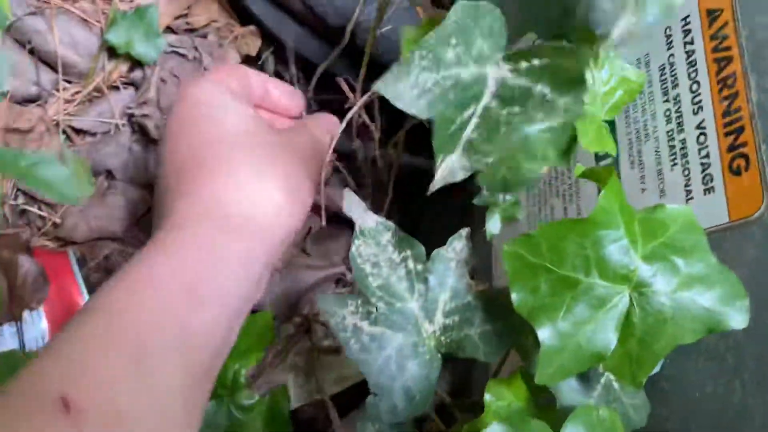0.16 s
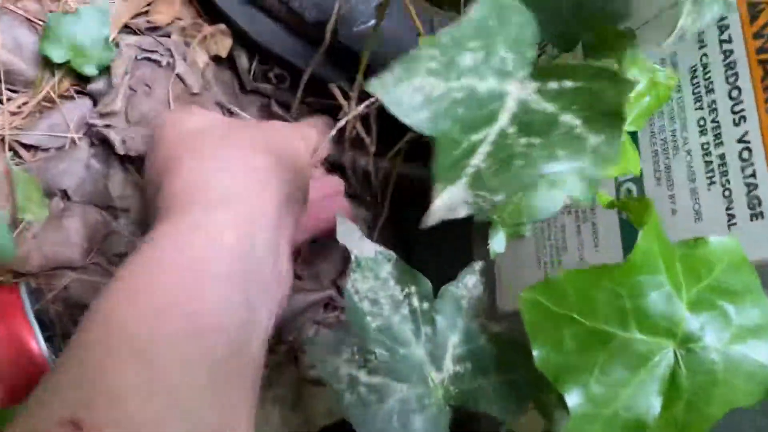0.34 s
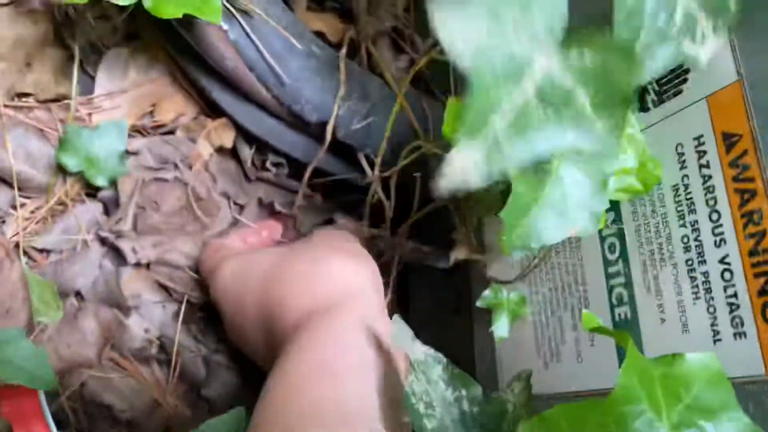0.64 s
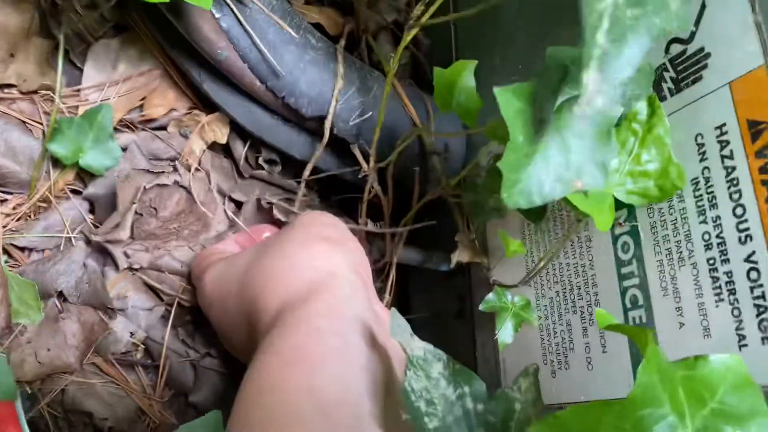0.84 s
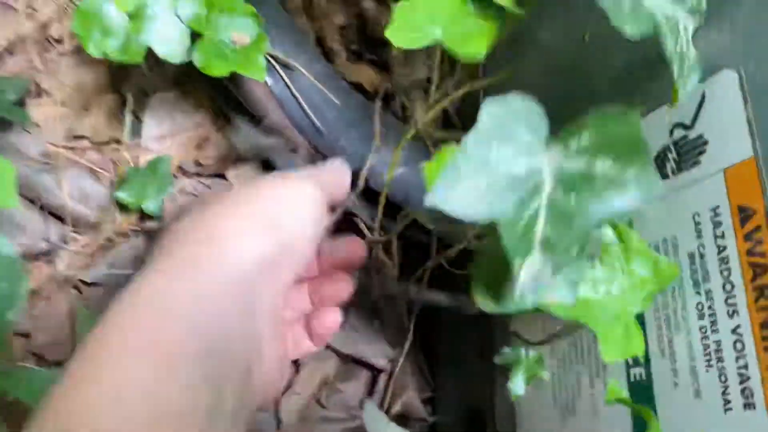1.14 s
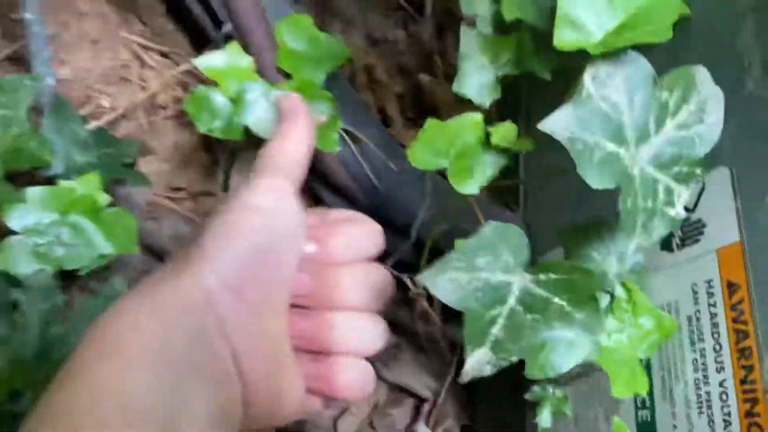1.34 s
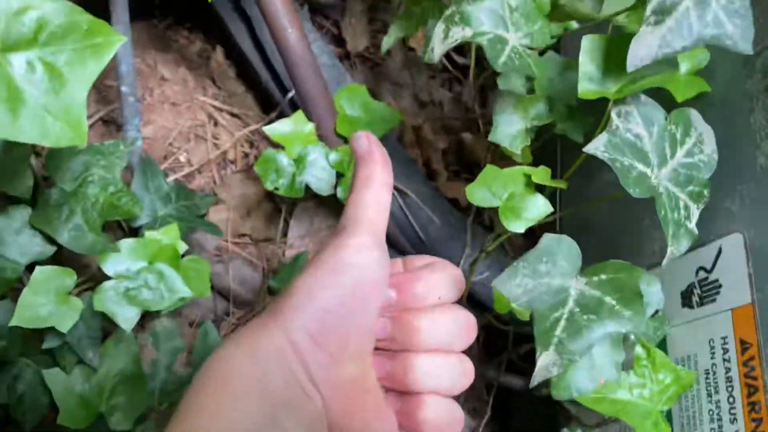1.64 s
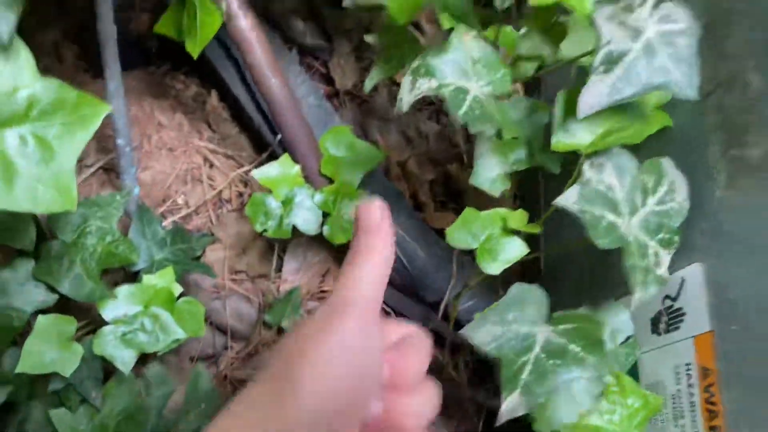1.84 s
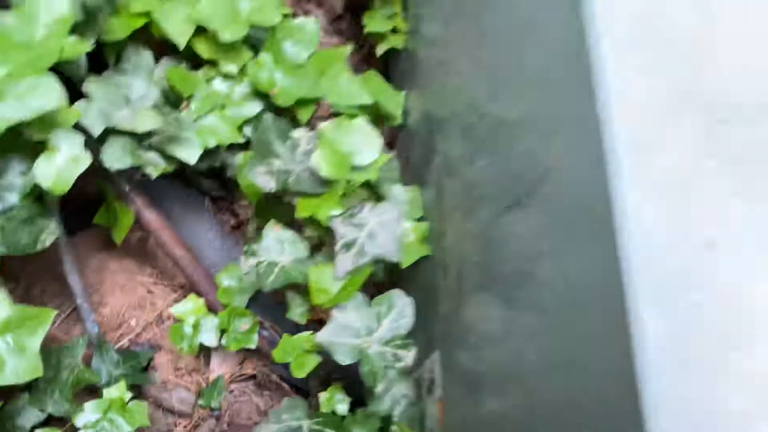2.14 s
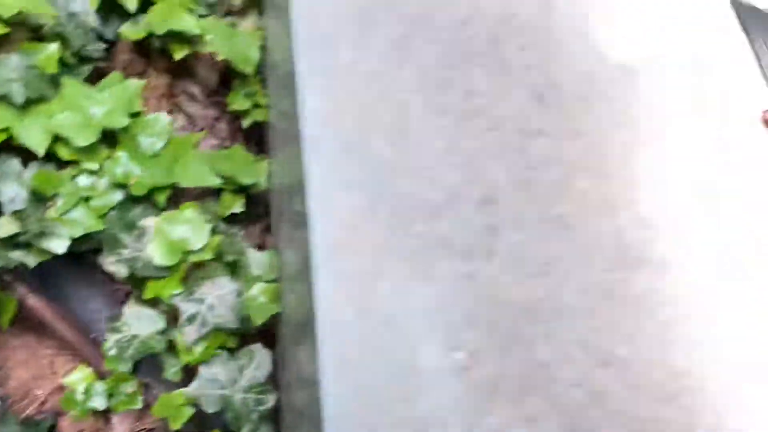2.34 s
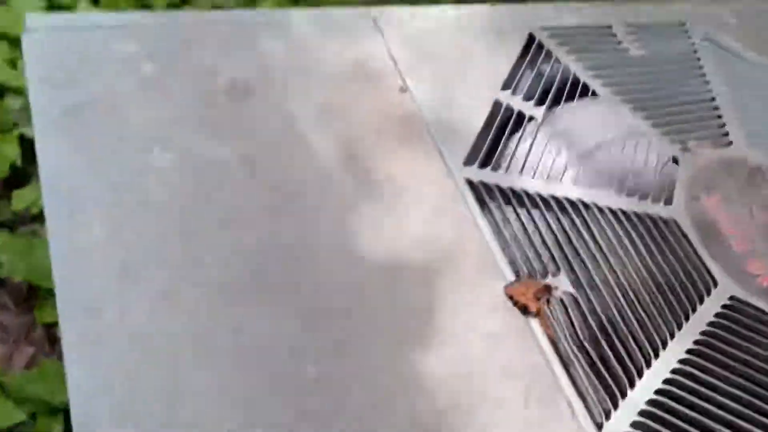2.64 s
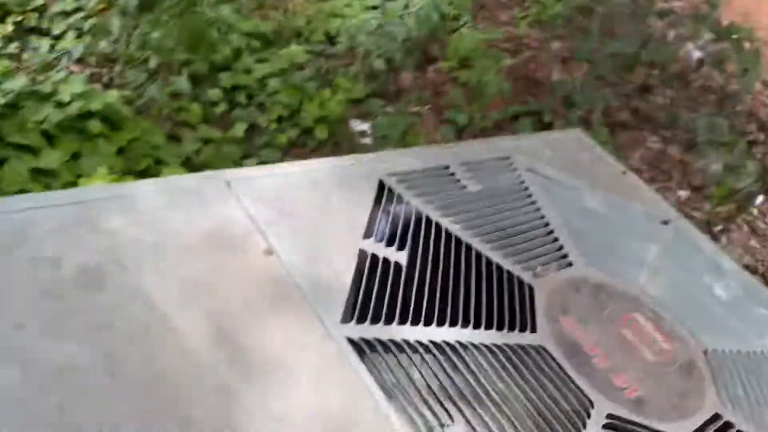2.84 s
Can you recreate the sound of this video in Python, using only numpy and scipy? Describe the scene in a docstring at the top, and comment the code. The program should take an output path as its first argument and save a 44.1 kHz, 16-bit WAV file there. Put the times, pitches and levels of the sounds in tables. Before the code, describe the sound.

An outdoor air conditioner hums low and steadily, its fan air fluttering slightly, for three seconds. Close to the microphone, dry leaves crinkle and twigs snap from 0 to about 1.2 seconds, busiest early on. Mostly machine drone follows until a loud, tearing crack at 2.2 seconds momentarily ducks everything. The air then grows brighter and rushing above the grille, with a short knock near 2.9 seconds.

```python
"""An outdoor air conditioner runs: wavering sine multiples for compressor, mains hum and two-bladed fan,
and coloured noise, chopped at blade rate, for its air. The microphones rise over the top grille into brighter outflow.
A stem cracks close by (tearing bursts of grainy noise with a pitched body) and ducks the recorder's limiter.
Snaps and hollow knocks (dying pitched bursts) sound as a hand pulls at vines and dry leaves (clumps of grains)."""
import sys
import numpy as np
from scipy import signal
from scipy.fft import rfft, irfft
from scipy.io import wavfile
from scipy.ndimage import uniform_filter1d, minimum_filter1d

SR = 44100
rng = np.random.default_rng(int(sys.argv[2]) if len(sys.argv) > 2 else 0)


def digitize_waveform(pressure):
    """Quantize a signal to 16-bit integers and store it at the path in sys.argv[1].

    Rows of a 2-D input are taken as channels; values are limited to [-1, 1].
    """
    field = np.atleast_2d(pressure).T
    bounded = np.clip(field, -1, 1)
    quanta = np.round(bounded * 32767).astype(np.int16)
    wavfile.write(sys.argv[1], SR, quanta)


N = 132300

# Partials of each machine: (multiple, level [dB rms], left minus right [dB])
COMPRESSOR_PARTIALS = [(1, -22, -2.5), (4, -33, 6.5)]
MAINS_PARTIALS = [(1, -31.5, 0.32), (2, -36, 0.75), (3, -44, 1)]
BLADE_PARTIALS = [(1, -39.5, 0), (2, -27.5, 1), (3, -35.5, 0.54), (4, -36.5, 0.27), (6, -38.5, 0.2)]
# Hum swell as the microphones move: (time [s], compressor [dB], mains hum [dB], blades [dB])
HUM_SWELL = [(0, -0.5, 2.5, 3.6), (.4, -3.3, -2, -0.3), (.8, -1.5, 2.5, 1.3), (1.2, -2.3, -1.7, 0.1),
             (1.6, -1.2, 2.1, 2.5), (2.0, 1.5, 1.1, -0.5), (2.4, -2, 0.7, 1.5), (2.7, 2, 3, 3.2),
             (3, -6.5, -19, -1.5)]
# Air levels: (time [s], near the ground [dB], beside the cabinet [dB], above the grille [dB], grille hiss [dB])
AIR_LEVELS = [(0, -23, -40, -37, -59), (.5, -24, -36, -37.5, -63), (.95, -23, -33.5, -37, -69),
              (1.3, -29.5, -25.5, -35, -66), (1.7, -40.5, -25, -37.5, -55), (1.9, -36, -24, -36.5, -48.5),
              (2.08, -41, -23.5, -31, -44), (2.2, -45, -17, -30.5, -42), (2.45, -27, -32.5, -21.5, -43),
              (2.65, -30.5, -32, -21, -40), (2.8, -43, -30, -20.5, -41), (2.92, -38, -38, -21, -41),
              (3, -20, -55, -24, -36)]
# Outflow roar through the slats: (time [s], level [dB])
ROAR_LEVELS = [(0, -75), (2.2, -60), (2.4, -49), (2.6, -43), (2.8, -41), (3, -36)]
# Relative spectra of the air, in the same order, roar last: (frequency [Hz], level [dB])
GROUND_AIR_COLOUR = [(20, -33), (45, -4.5), (100, 0), (125, 0), (150, -11), (185, -8.5), (240, -23.5),
                     (280, -25), (390, -10.5), (480, -15.5), (800, -21.5), (1000, -30.5), (1200, -27.5),
                     (2000, -33.5), (4000, -44), (7000, -42.5), (9000, -53), (12000, -60), (16000, -72)]
SIDE_AIR_COLOUR = [(20, -38), (45, -4.5), (90, -6), (120, -7.5), (170, -9.5), (240, -7.5), (300, -12),
                   (400, -13.5), (460, -26.5), (600, -15), (700, -24.5), (820, -29.5), (1030, -23),
                   (1400, -33), (2000, -36.5), (3000, -39), (7000, -46.5), (9000, -60.5), (12000, -56),
                   (16000, -76)]
TOP_AIR_COLOUR = [(50, -15), (100, -28), (155, 5.5), (195, 1.5), (240, 2), (270, 0.5), (360, 4.5),
                  (435, -1), (500, -7.5), (570, -11.5), (650, -7.5), (750, -2.5), (860, -4.5), (960, -9),
                  (1500, -13.5), (2200, -21.5), (3200, -39), (5000, -33), (16000, -90)]
GRILLE_HISS_COLOUR = [(800, -19), (2000, -3.5), (3000, 1.5), (4500, -4), (7000, -9.5), (9000, -21),
                      (12000, -18.5), (16000, -60)]
ROAR_COLOUR = [(400, -30), (750, 1), (1100, -6), (1700, -2), (2400, -3), (3200, -14), (6000, -42)]
# Stereo image of the air, low down and on top: (frequency [Hz], common share [-1 to 1], left minus right [dB])
SIDE_PAIR = [(60, 0.96, -3), (408, 0.9, -2.5), (770, 0.48, 0), (1470, 0.096, -2), (3000, 0.19, 0),
             (12000, 0.9, -1)]
TOP_PAIR = [(100, 0.69, -6), (297, 1, -3), (547, 0.91, -5.5), (1500, 0.35, -2.5), (3000, 0.15, 1.5),
            (12000, 0.11, -1.5)]
# Tearing bursts of the close crack: (time [s], body [dB], treble [dB], hold [s], decay t60 [s])
CRACK_BURSTS = [(2.198, -3, -8, 0.0084, 0.019), (2.2091, -2.5, -2, 0.0076, 0.011),
                (2.2176, -14.5, -14.5, 0.0033, 0.042)]
# Relative spectrum of the crack: (frequency [Hz], level [dB])
CRACK_COLOUR = [(200, -18), (440, 6.5), (590, -4), (800, 3.5), (1050, -0.5), (1300, -12), (1500, -2),
                (2050, -17), (2740, -5), (3050, -10), (3400, -7), (4400, -12), (5120, -3), (6200, -11),
                (7340, -7.5), (8300, -15.5), (11900, -15.5), (16400, -53)]
# Stereo image of the crack: (frequency [Hz], common share [-1 to 1], left minus right [dB])
CRACK_PAIR = [(500, -0.53, 1.1), (4100, -0.093, 4.2), (12000, -0.18, 0.9)]
# Snaps of twigs and leaves, then narrow, hollow knocks and the pitched body of the crack:
# (time [s], nominal level [dB], left minus right [dB], pitch [Hz], decay t60 [s])
SNAPS = [(0.1036, -28, 1.0, 4660, 0.036), (0.1655, -17.5, 2, 5130, 0.032), (0.1665, -18.5, 2, 2540, 0.021),
         (0.19, -26, 0, 4830, 0.03), (0.201, -27, -5, 3900, 0.034), (0.212, -34, -2, 4350, 0.03),
         (0.231, -31, 0, 4640, 0.02), (0.259, -28, 0, 4260, 0.033), (0.2184, -19.5, -1, 4540, 0.075),
         (0.3025, -22, -1, 4650, 0.018), (0.311, -26, 2, 4570, 0.023), (0.3278, -10.5, -2, 4400, 0.011),
         (0.3285, -23.5, 4, 2240, 0.027), (0.369, -26, 2, 4060, 0.025), (0.47, -36, -1, 4450, 0.03),
         (0.4984, -19.5, 5, 3760, 0.019), (0.5252, -28, 3, 3800, 0.03), (0.5446, -26, -4, 2950, 0.025),
         (0.6762, -29, 0, 4000, 0.031), (0.7555, -21, 6, 4640, 0.038), (0.788, -26, 1.0, 5100, 0.024),
         (0.806, -24.5, 2, 3760, 0.044), (0.829, -36, -6, 3800, 0.021), (0.854, -23, 0, 9900, 0.019),
         (0.8829, -27, 7, 4590, 0.03), (0.978, -30, 1.0, 2930, 0.034), (1.0868, -33, 1, 4970, 0.053),
         (1.1258, -33, 14, 4550, 0.029), (1.261, -34, 12, 3350, 0.023), (2.174, -26, 2, 1600, 0.02),
         (2.925, -41, -4, 2000, 0.012), (2.9305, -17, 6, 1900, 0.021), (2.931, -10.5, 4, 900, 0.015)]
KNOCKS = [(.038, -21.5, 3, 1046, 0.059), (.204, -23, 1, 1000, 0.14), (.815, -36.5, -21, 619.6, 0.19),
          (2.176, -18, -6, 242, 0.097), (2.192, -15, 5, 1050, 0.045), (2.199, 1, -5, 754, 0.027),
          (2.209, -15, -12, 460, 0.07)]
# Leaves dragged by the hand: (time [s], level [dB])
RUSTLE_LEVELS = [(0, -32), (.05, -34.5), (.12, -37), (.135, -49), (.18, -38.5), (.2, -29.5), (.235, -31.5),
                 (.275, -33), (.295, -38), (.305, -37), (.34, -33), (.38, -32), (.415, -43), (.455, -39),
                 (.49, -38.5), (.53, -38), (.58, -31.5), (.62, -38.5), (.66, -50), (.68, -35.5), (.75, -38),
                 (.82, -39.5), (.88, -50.5), (.93, -42), (.99, -36), (1.05, -35.5), (1.135, -37),
                 (1.15, -44), (1.2, -46), (1.26, -51.5), (1.33, -61), (1.9, -83), (2.05, -73), (2.18, -49),
                 (2.2, -70), (3, -72)]
# Relative spectrum of the leaves: (frequency [Hz], level [dB])
LEAF_COLOUR = [(500, -30), (900, -4.5), (1500, -11), (2320, -12), (3300, -9.5), (4300, -5.5), (5500, -12),
               (7130, -11), (9000, -22), (11500, -13.5), (13000, -33), (16400, -26)]
# Stereo image of the leaves: (frequency [Hz], common share [-1 to 1], left minus right [dB])
LEAF_PAIR = [(800, -0.23, 0), (3140, 0.25, 0.96), (7000, 0.003, 1.2), (11900, 0.035, 0)]

COMPRESSOR_HZ, MAINS_HUM_HZ, BLADE_HZ = 58.75, 119.85, 36.17
COMPRESSOR_WAVER_DB, MAINS_WAVER_DB, BLADE_WAVER_DB, WAVER_HZ = 0.8, 0.5, 1.5, 4.0
# the left microphone hears later by these lags
HUM_LAG_S, SIDE_LAG_S, TOP_LAG_S, CRACK_LAG_S, BLOW_LAG_S = 0.001, 0.00084, 0.00049, 0.00033, 0.000265
CHOP_DB = 0.78  # peak swing at blade rate
GUST_DB, GUST_HZ = 0.6, 9.0
PATCH_DB, BROAD_PATCH_DB = 2.0, 0.7  # rms level changes
CRACK_GRAINS_PER_S, CRACK_GRAIN_SHARE = 3700.0, 0.38
CRACK_RISE_S, CRACK_SPLIT_HZ = 0.003, 4700
CRACK_TAIL_DB, CRACK_TAIL_T60_S = -24.5, 0.25
SNAP_WIDTH, SNAP_BROAD_DB, SNAP_RISE_S = 0.35, -8, 0.0007  # width as a fraction of pitch
KNOCK_WIDTH, KNOCK_BROAD_DB, KNOCK_RISE_S = 0.072, -38, 0.004
OWN_GAIN, RING_GAIN = 0.8, 0.5  # noise differing between sides; clean ring within a blow
BRITTLE_HZ = 3000  # blows pitched lower carry less broad crackle
LEAF_GRAINS_PER_S, LEAF_GRAIN_SHARE = 900, 0.43
GRAIN_SPREAD_DB, GRAIN_CYCLES = 3, 11  # ring length in cycles to -60 dB
CLUMP_DB, CLUMP_HZ = 2.0, 25
MIC_LOW_CUT_HZ, TOP_STOP_HZ = 31.6, 16500
CEILING_DB, LOOK_S, HOLD_S, RELEASE_DB_PER_S = -12, 0.0037, 0.099, 109


def amp(db):
    """Amplitude ratio of a level in dB."""
    return 10 ** (np.asarray(db) / 20)


def rms_one(x):
    """Scale to an rms of 1."""
    return x / np.sqrt(np.mean(x ** 2) + 1e-20)


def in_time(rows):
    """Interpolate each table column over the scene's samples."""
    time_s, *columns = np.transpose(rows)
    return [np.interp(np.arange(N) / SR, time_s, column) for column in columns]


def in_hz(rows, hz):
    """Interpolate each table column over log frequency."""
    at_hz, *columns = np.transpose(rows)
    return [np.interp(np.log(hz + 1), np.log(at_hz), column) for column in columns]


def drift(rate_hz):
    """Slow random drift of rms 1: noise through two equal poles, computed at every 40th sample."""
    pole = np.exp(-2 * np.pi * rate_hz * 40 / SR)
    noise = rng.standard_normal(N // 40 + 2002)
    slow = signal.lfilter([1], [1, -2 * pole, pole * pole], noise)[2000:]
    return np.interp(np.arange(N) / 40, np.arange(len(slow)), rms_one(slow))


def sides(pan_db):
    """Left and right gains that differ by pan_db."""
    return amp(np.array([[.5], [-.5]]) * pan_db)


def at_pair(sources, colour, pair, lag_s):
    """Colour three sources: one reaches both microphones, the left later; each side adds its own."""
    hz = np.arange(N // 2 + 1) * SR / N
    common, left, right = rfft(sources) * amp(in_hz(colour, hz)[0])
    share, pan_db = in_hz(pair, hz)
    share = np.clip(share, -1, 1)  # below zero: opposite polarity
    common = np.sqrt(np.abs(share)) * common
    own_gain = np.sqrt(1 - np.abs(share))
    at_left = common * np.exp(-2j * np.pi * hz * lag_s) + own_gain * left
    at_right = np.sign(share) * common + own_gain * right
    return rms_one(irfft(np.array([at_left, at_right]) * sides(pan_db), N))


def hum(hz, partials, waver_db):
    """Rotation and mains force sines at steady multiples of one rate; each level wavers."""
    t = np.arange(N) / SR - np.array([[HUM_LAG_S], [0]])
    out = 0
    for multiple, db, pan_db in partials:
        gain = np.sqrt(2) * amp(db + waver_db * drift(WAVER_HZ)) * sides(pan_db)
        out = out + gain * np.sin(2 * np.pi * (multiple * hz * t + rng.random()))
    return out


def machine_tones():
    """Compressor, mains hum and fan blades, swelling as the microphones move."""
    machines = [(COMPRESSOR_HZ, COMPRESSOR_PARTIALS, COMPRESSOR_WAVER_DB),
                (MAINS_HUM_HZ, MAINS_PARTIALS, MAINS_WAVER_DB),
                (BLADE_HZ, BLADE_PARTIALS, BLADE_WAVER_DB)]
    return sum(amp(db) * hum(*machine) for db, machine in zip(in_time(HUM_SWELL), machines))


def air():
    """Turbulence chopped by the blades; its colour changes as the microphones rise to the grille."""
    chop_db = CHOP_DB * np.sin(2 * np.pi * BLADE_HZ * np.arange(N) / SR)
    places = [(GROUND_AIR_COLOUR, SIDE_PAIR, SIDE_LAG_S),
              (SIDE_AIR_COLOUR, SIDE_PAIR, SIDE_LAG_S),
              (TOP_AIR_COLOUR, TOP_PAIR, TOP_LAG_S),
              (GRILLE_HISS_COLOUR, TOP_PAIR, TOP_LAG_S),
              (ROAR_COLOUR, TOP_PAIR, TOP_LAG_S)]
    out = 0
    for db, place in zip(in_time(AIR_LEVELS) + in_time(ROAR_LEVELS), places):
        gain = amp(db + chop_db + GUST_DB * drift(GUST_HZ))
        out = out + gain * at_pair(rng.standard_normal((3, N)), *place)
    return out


def patchy(x):
    """Random level changes give the noise an uneven grain: narrow ones and broader, shorter ones."""
    spectra = signal.stft(x, nperseg=2048)[2]
    fine, broad = rng.standard_normal((2,) + spectra.shape[1:])
    fine = uniform_filter1d(uniform_filter1d(fine, size=3, axis=0), size=3, axis=1)
    broad = uniform_filter1d(uniform_filter1d(broad, size=24, axis=0), size=2, axis=1)
    change_db = PATCH_DB * rms_one(fine) + BROAD_PATCH_DB * rms_one(broad)
    return signal.istft(spectra * amp(change_db), nperseg=2048)[1][:, :N]


def grains(per_s, share):
    """Uneven random clicks, each ringing briefly at one of 16 pitches, over a bed of friction noise."""
    sizes = amp(GRAIN_SPREAD_DB * np.minimum(rng.exponential(1, (3, N)), 4))
    sizes = sizes * rng.choice([-1, 1], (3, N))
    clicks = sizes * (rng.random((3, N)) < per_s / SR)
    pitch_index = rng.integers(0, 16, (3, N))
    rings = 0
    for k, hz in enumerate(np.geomspace(900, 14000, num=16)):
        pole = amp(-60 * hz / (GRAIN_CYCLES * SR))
        resonator = [1, -2 * pole * np.cos(2 * np.pi * hz / SR), pole * pole]
        struck = clicks * (pitch_index == k) + 1e-18
        rings = rings + hz * signal.lfilter([1, 0, -1], resonator, struck)
    return share * rms_one(rings) + (1 - share) * rng.standard_normal((3, N))


def crack():
    """A stem tears close by: grainy bursts hold, die fast and leave a faint tail."""
    tear = at_pair(grains(CRACK_GRAINS_PER_S, CRACK_GRAIN_SHARE), CRACK_COLOUR, CRACK_PAIR, CRACK_LAG_S)
    body = signal.sosfilt(signal.butter(2, CRACK_SPLIT_HZ, fs=SR, output="sos"), tear)
    treble = tear - body
    out = 0
    for start_s, body_db, treble_db, hold_s, t60_s in CRACK_BURSTS:
        t = np.arange(N) / SR - start_s
        late_s = np.maximum(t - hold_s, 0)
        tail = amp(CRACK_TAIL_DB - 60 * late_s / CRACK_TAIL_T60_S)
        shape = np.clip(t / CRACK_RISE_S, 0, 1) * (amp(-60 * late_s / t60_s) + tail)
        out = out + shape * (amp(body_db) * body + amp(treble_db) * treble)
    return out


def blows(rows, width, broad_db, rise_s):
    """Each blow is a dying burst: noise around its pitch, a clean ring and broad crackle."""
    out, t = np.zeros((2, N + 4096)), np.arange(4096) / SR
    noises = rng.standard_normal((len(rows), 3, 4096))
    for (start_s, db, pan_db, hz, t60_s), noise in zip(rows, noises):
        common = np.array([np.interp(t - BLOW_LAG_S, t, noise[0]), noise[0]])
        pair = common + OWN_GAIN * noise[1:]
        edges_hz = [hz / (1 + width), min(hz * (1 + width), .45 * SR)]
        band = signal.butter(2, edges_hz, "band", fs=SR, output="sos")
        # filtered backwards, so the band is already full at the onset
        body = rms_one(signal.sosfilt(band, pair[:, ::-1])[:, ::-1])
        body = body + RING_GAIN * np.sqrt(2) * np.sin(2 * np.pi * hz * t)
        brittle = min(hz / BRITTLE_HZ, 1) ** 3
        crackle = amp(broad_db) * brittle * rms_one(np.diff(pair, prepend=0))
        shape = np.minimum(t / rise_s, 1) * amp(-60 * t / t60_s)
        burst = rms_one(shape * (body + crackle)) * np.sqrt(np.mean(shape ** 2))
        i = int(start_s * SR)
        out[:, i:i + len(t)] += amp(db - 4.5) * sides(pan_db) * burst  # nominal level less 4.5 dB
    return out[:, :N]


def snaps():
    """Twigs and leaves snap: broad, sharp, crackling blows."""
    return blows(SNAPS, SNAP_WIDTH, SNAP_BROAD_DB, SNAP_RISE_S)


def knocks():
    """Narrow, hollow knocks, and the pitched body of the crack, with a softer rise."""
    return blows(KNOCKS, KNOCK_WIDTH, KNOCK_BROAD_DB, KNOCK_RISE_S)


def rustle():
    """Leaves crinkle in clumps of grains under each pull of the hand."""
    level_db = in_time(RUSTLE_LEVELS)[0] + CLUMP_DB * drift(CLUMP_HZ)
    return amp(level_db) * at_pair(grains(LEAF_GRAINS_PER_S, LEAF_GRAIN_SHARE), LEAF_COLOUR, LEAF_PAIR, 0)


def scene():
    """Sum the machine, its air and the plants; air and leaves share the uneven grain."""
    return machine_tones() + patchy(air() + rustle()) + snaps() + knocks() + crack()


def record(dry):
    """Low cut, look-ahead limiter that ducks, holds and lets go, soft clipping, then a steep top cut."""
    dry = signal.sosfilt(signal.butter(3, MIC_LOW_CUT_HZ, "high", fs=SR, output="sos"), dry)
    look, hold = max(int(LOOK_S * SR), 2), max(int(HOLD_S * SR), 2)
    power = uniform_filter1d(np.mean(dry ** 2, axis=0), 4 * look)
    over_db = np.maximum(10 * np.log10(np.abs(power) + 1e-12) - CEILING_DB, 0)
    held_db = -minimum_filter1d(-over_db, hold, origin=(hold - 1) // 2)
    ramp_db = RELEASE_DB_PER_S * np.arange(N) / SR
    released_db = np.maximum.accumulate(held_db + ramp_db) - ramp_db
    duck_db = uniform_filter1d(released_db, look)
    limited = np.tanh(dry * amp(-duck_db))
    return signal.sosfilt(signal.cheby2(20, 60, TOP_STOP_HZ, fs=SR, output="sos"), limited)


dry = scene()
out = record(dry)
digitize_waveform(out)
```